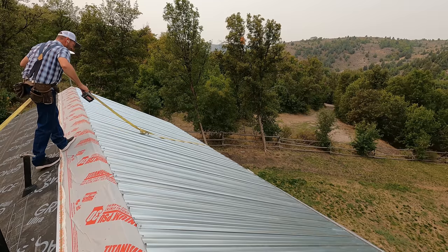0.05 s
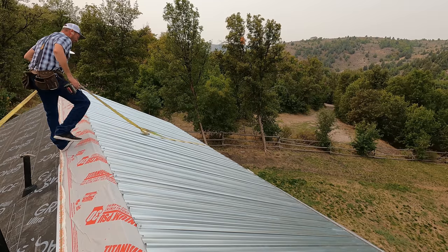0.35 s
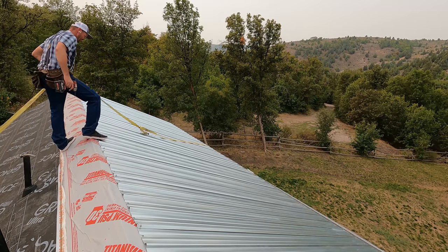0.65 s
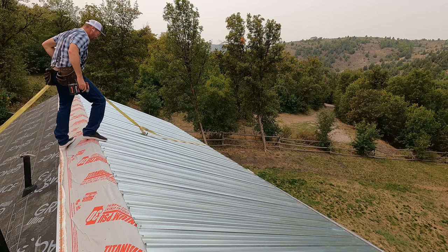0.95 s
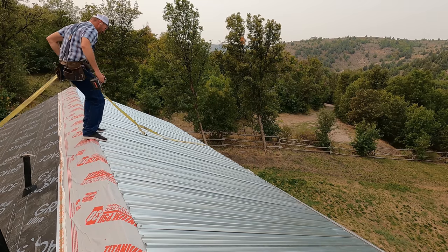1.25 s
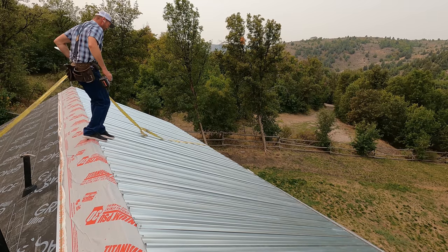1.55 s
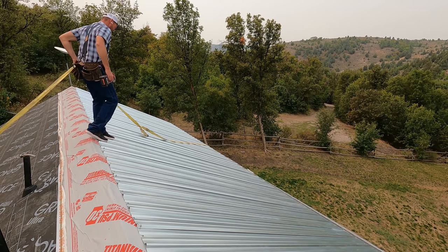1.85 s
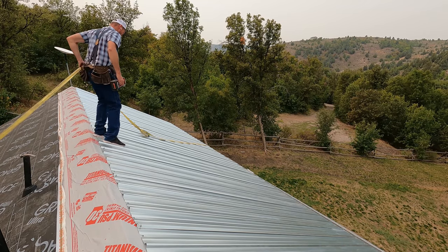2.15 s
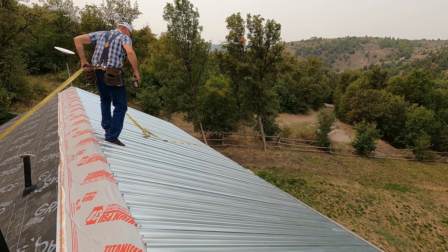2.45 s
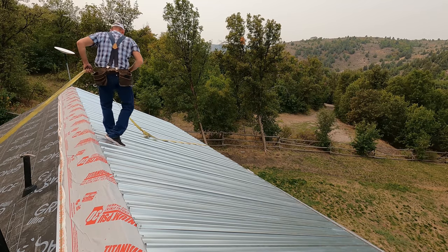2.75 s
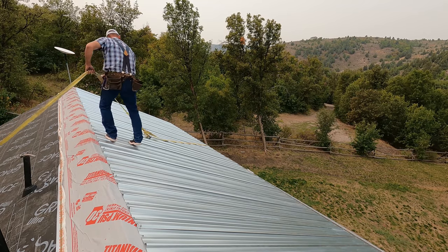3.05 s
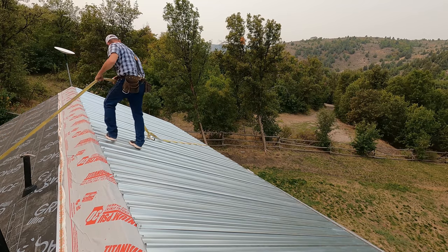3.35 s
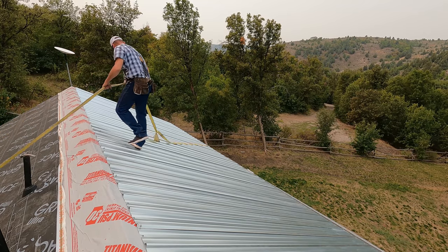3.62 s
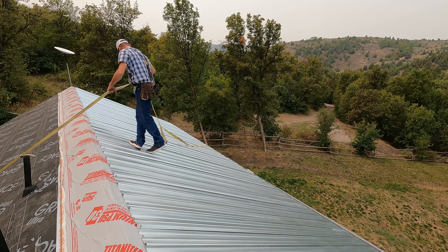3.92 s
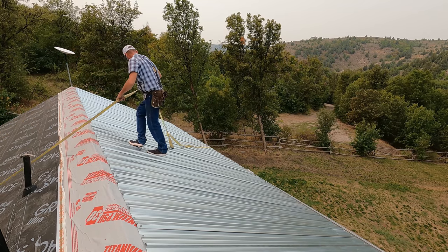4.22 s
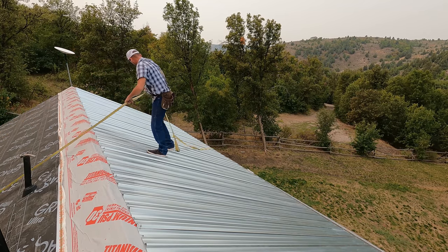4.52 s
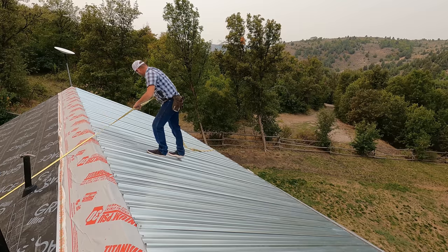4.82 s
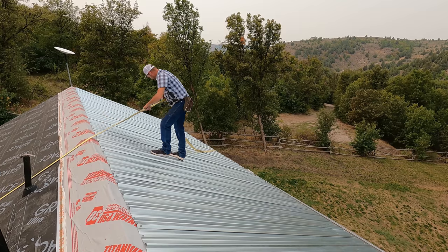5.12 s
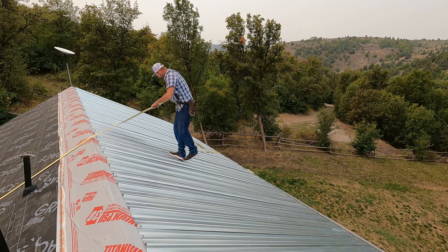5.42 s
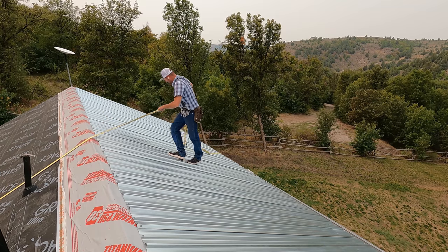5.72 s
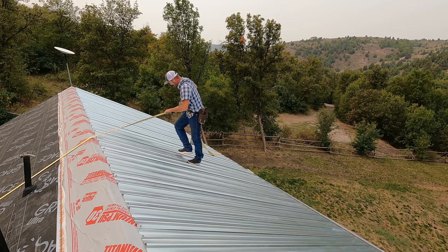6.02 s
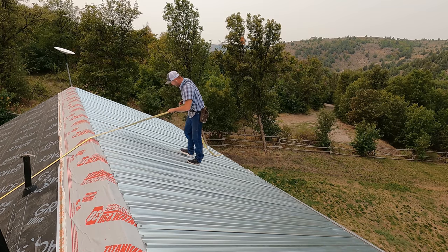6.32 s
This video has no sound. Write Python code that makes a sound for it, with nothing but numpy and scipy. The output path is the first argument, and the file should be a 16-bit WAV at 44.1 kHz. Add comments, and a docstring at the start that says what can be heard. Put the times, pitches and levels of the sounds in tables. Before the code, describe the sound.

Footsteps clack and thud on loose ribbed metal roof panels, with harness hardware clinking and soles scuffing in open air.

```python
"""Loose ribbed steel panels clack under a roofer who steps over the ridge and backs down on a safety rope.
Each step slaps the sheet against the deck in a cluster of clacks; the deck thuds and the ribs buzz.
Steel rings, a snap hook and a buckle clink on his harness; underlay ticks, soles and rope scuff.
One microphone a few metres away, in open air with almost no echo; faint wind in distant trees."""
import sys
import numpy as np
from scipy import signal
from scipy.fft import rfft, irfft
from scipy.io import wavfile

SR = 44100
rng = np.random.default_rng(int(sys.argv[2]) if len(sys.argv) > 2 else 0)


def wav_record(signal):
    """Record a signal, one row per channel, as 16-bit PCM in the file named by sys.argv[1]."""
    frames = np.transpose(np.atleast_2d(signal))
    bounded = np.clip(frames, -1, 1)
    # unit amplitude maps onto the largest positive 16-bit level
    quanta = np.round(bounded * 32767).astype(np.int16)
    wavfile.write(sys.argv[1], SR, quanta)


N = 289720
SPAN = int(.7 * SR)  # samples in one event
AGE = np.arange(SPAN) / SR  # seconds since it began

# tone of the steel panel: (frequency [Hz], level [dB])
PANEL = [(40, -16), (95, -12.5), (135, -6), (200, -3), (420, 2), (620, 5.5), (930, 0.5), (1400, 5),
         (2100, 7.5), (3600, -12), (4500, -16), (7400, -32), (9200, -46), (10700, -43), (15000, -72)]
# its resonances and dips: (frequency [Hz], width [Hz], lift [dB])
RESONANCES = [(155, 23, 0.5), (268, 18, 5), (317, 30, 3), (374, 47, 3), (507, 22, -2), (510, 40, 1.5),
              (595, 42, 1.5), (686, 33, -0.5), (1513, 50, 4), (1555, 27, 4), (1895, 13, 7.5),
              (1934, 230, -6), (2010, 28, 5), (2090, 32, -14), (2297, 57, -14)]
# sheet hitting the deck: (time [s], force [dB], crack sharpness [dB], weight on the deck [dB]);
# the last two count from the force
SLAPS = [(.001, -46.5, 4, 2), (.035, -55, 7, -8), (.057, -44, 15, 4), (0.114, -52, 8, 11),
         (0.175, -55, 6, -4), (0.272, -43, -7, -3.5), (.354, -42, 16, -14), (.727, -67, 0, 11.5),
         (.86, -65, 0, 15.5), (1.048, -44, 12.5, -26), (1.19, -45, 0, -11), (1.197, -39.5, 14, -17),
         (1.216, -41.5, 16, -15), (1.236, -34.5, 17, -8), (1.292, -42.5, 13, -4), (1.317, -42, 10, -5),
         (1.342, -42, 6, 0), (1.367, -41, 6, -4), (1.416, -44, 8, 3.5), (1.476, -35.5, 16, -10),
         (1.529, -40, 19, 3.5), (1.577, -50, 5, 4), (1.626, -49.5, 10, 4), (1.685, -37.5, 11, -11.5),
         (2.259, -59, 21, 13), (2.308, -59, 20, 9.5), (2.409, -57, 11, -17), (2.456, -56, 21, -15),
         (2.471, -51.5, 4, -26), (3.009, -71, -3, 15), (3.23, -42, 9, 1), (3.239, -40.5, 20, -0.5),
         (3.307, -46, 12, 3), (3.36, -49.5, 2, -12), (3.419, -52.5, 10, 0), (3.528, -50.5, -2, 3),
         (3.605, -46.5, 18, 5), (3.656, -48.5, 5, 12.5), (3.7, -43, 1, 1), (3.751, -40.5, 2, 6),
         (3.861, -31.5, 13, -2.5), (3.93, -35.5, 7, -10), (3.964, -36.5, 16.5, -7.5),
         (4.106, -52.5, 10.5, -10), (4.192, -48.5, 10, 12), (4.226, -47.5, 12.5, -13),
         (4.249, -31, 15.5, 4), (4.258, -33.5, 11.5, -8), (4.394, -41.5, 4, -9), (4.42, -47.5, 0, -7),
         (4.491, -48, 17, -10), (4.604, -35, 11, -7.5), (4.702, -40, -5, -7), (4.727, -36.5, 5, -7),
         (4.831, -40, 0, -4), (4.947, -47, 4, -4), (5.215, -55.5, 0, 0), (5.687, -60.5, 8, 8),
         (6.359, -61.5, 20, -37), (6.546, -47.5, 7, -19)]
USUAL_FORCE_DB = -42


def sheet_slaps(bass_hz=800, treble_hz=3500, middle_t60=0.17, rattle_db=2, grit_db=-14):
    """A few metres off, the sheet cracks against the deck, rattles on it and rings briefly."""
    out, onset = np.zeros(N), int(0.01 * SR)
    for s, force_db, sharp_db, weight_db in SLAPS:
        shake = rng.standard_normal(SPAN) + undb(rattle_db) * contacts(500, 5.3, SPAN)
        sheet = colour(shake, PANEL, RESONANCES)
        bass = band(sheet, bass_hz, "low") * fade(middle_t60 * 0.94) * (1 - np.exp(-AGE / 0.00043))
        middle = band(sheet, [bass_hz, treble_hz], "band") * fade(middle_t60)
        treble = band(sheet, treble_hz, "high") * fade(middle_t60 * 0.88)
        # harder slaps are brighter; weight adds bass
        harder_db = force_db - USUAL_FORCE_DB
        bass_db = -.5 - 0.11 * harder_db + .15 * weight_db
        treble_db = -5 + 0.36 * harder_db
        for part, db in (bass, bass_db), (middle, 0), (treble, treble_db):
            add(out, s, part * undb(force_db + db) / np.std(part[:onset]))
        blow = (AGE == 0) + undb(grit_db) * contacts(5000, 3, SPAN) * fade(0.0057)
        crack = colour(blow, PANEL, RESONANCES)
        add(out, s + 0.000953, crack * undb(force_db + sharp_db - 2) / np.abs(crack).max())
    # a thin open sheet radiates little deep bass
    return band(out, 85, "high", order=1)


def deck_thuds(main_hz=152.2, detune=0.062, t60=0.19, push_s=0.0058, gain_db=-4.5):
    """The deck gives under the weight behind each slap: a few low, heavily damped modes."""
    out = np.zeros(N)
    envelope = fade(t60) * (1 - np.exp(-AGE / push_s))
    for s, force_db, _, weight_db in SLAPS:
        for ratio, mode_db in (.6, -12), (.8, -5), (1, -1.5), (1.4, -3), (1.9, -14):
            hz = main_hz * ratio * (1 + detune * rng.standard_normal())
            mode = np.sin(2 * np.pi * (hz * AGE + rng.random()))
            add(out, s, undb(force_db + weight_db + mode_db + gain_db) * mode * envelope)
    return band(out, 90, "high", order=4)


# how loosely the panel underfoot lies: (time [s], buzz level relative to the force [dB])
LOOSENESS = [(0, -10), (2.6, -7), (3.25, 0.5), (3.6, -6), (3.9, 5.5), (4.3, 9.5), (4.65, -0.5), (5, -5.5),
             (6.57, -4)]


def rib_buzzes(rib_hz=2050, trip_s=0.011, packet_s=0.001064, trip_db=-3.0, trips=14, t60=0.2):
    """After a firm slap a wave packet runs to and fro along a rib, fading into a ring."""
    out = np.zeros(N)
    for s, force_db, _, _ in SLAPS:
        if force_db < USUAL_FORCE_DB - 6:
            continue
        sheet = colour(rng.standard_normal(SPAN), PANEL, RESONANCES)
        ring = undb(-3) * unit(band(sheet, [rib_hz * 0.867, rib_hz * 1.197], "band"))
        for trip, (late, pitch, size) in enumerate(rng.standard_normal((trips, 3))):
            since = AGE[:SPAN // 4] - packet_s - trip_s * (trip + 0.205 * late * min(trip, 1))
            tone = np.sin(2 * np.pi * rib_hz * (1 + .06 * pitch) * since)
            packet = np.exp(-(since / packet_s) ** 2) * tone
            ring[:len(packet)] += 1.3 * undb(0.65 * size + trip_db * trip) * packet
        loose_db = np.interp(s, *np.transpose(LOOSENESS))
        add(out, s + .007, undb(force_db + loose_db) * ring * fade(t60))
    return band(out, [1200, 4200], "band", order=2)


# modes of the two rings, the hook, its gate and the buckle: (frequency [Hz], level [dB], base t60 [s])
LARGE_RING = [(2501, 0, .26), (7340, -25, .2), (7438, -23, .2)]
SMALL_RING = [(2618, 0, .22), (6781, -14, .28), (7460, -14, .13), (7648, -10, .15), (7790, -19, .09),
              (13120, -35, .2)]
HOOK = [(3320, 0, .46)]
GATE = [(6126, 0, .28), (9955, -22, .32), (14050, -42, .3)]
BUCKLE = [(3145, -2, .12), (3405, -2, .19), (6440, -9, .1)]
# steel parts by name: (level [dB], free ringing [multiple of base t60], modes)
HARNESS = {"large ring": (0, 2.12, LARGE_RING), "small ring": (0, 1.8, SMALL_RING), "hook": (0, 1.84, HOOK),
           "gate": (-3.3, 1.83, GATE), "buckle": (-1.2, 1.6, BUCKLE)}
# two parts knocking together: (time [s], level [dB], overtone tilt [dB/octave],
# ring length [share of free ringing], struck part, striking part)
CLINKS = [(.302, -37.5, -6, 0.62, "buckle", "hook"), (.318, -35, -10.5, 0.46, "large ring", "small ring"),
          (1.637, -42.5, -15, 0.92, "large ring", "small ring"), (1.659, -53, -3, 1, "gate", "large ring"),
          (1.701, -38, -12, 0.91, "large ring", "small ring"), (1.731, -54, -2, 0.64, "gate", "large ring"),
          (1.817, -49.5, 0, 0.81, "large ring", "buckle"), (2.227, -60, -14, 1, "large ring", "buckle"),
          (3.822, -34.5, -8, 1, "large ring", "buckle"),
          (3.966, -31.5, 3.5, 0.86, "small ring", "large ring"), (3.966, -32, 7, 0.94, "gate", "hook"),
          (4.311, -34, -1, 1, "large ring", "small ring"), (4.405, -45.5, -10, 1, "hook", "large ring"),
          (4.608, -42.5, 3, 1, "large ring", "hook"), (4.673, -50, 2, 1, "gate", "large ring"),
          (4.748, -35.5, -10, .8, "small ring", "large ring"), (4.772, -43.5, -10, 0.8, "gate", "hook"),
          (4.795, -35.5, -11, 0.88, "buckle", "large ring"),
          (4.895, -46, -19.5, 1, "large ring", "small ring"), (5.202, -52, -11, 0.83, "small ring", "hook"),
          (5.834, -60, -16, 0.85, "large ring", "buckle")]


def harness_clinks(striker_db=-4, neighbour_db=-13.5, scatter_db=2.0, spin_hz=9, contact_s=0.0011):
    """On the roofer's harness two steel parts knock together, chatter and shake their neighbours."""
    out = np.zeros(N)
    for s, knock_db, tilt_db, free, struck, striker in CLINKS:
        for name, (part_db, length, modes) in HARNESS.items():
            share_db = {struck: 0, striker: striker_db}.get(name, neighbour_db)
            for hz, db, t60 in modes:
                size, speed = rng.standard_normal(2)
                mode_db = db + tilt_db * np.log2(hz / modes[0][0]) + scatter_db * size
                envelope = fade(t60 * length * free) * (1 - np.exp(-(AGE / contact_s) ** 2))
                # a swinging part turns its lobes past the microphone, so each mode dips and swells
                lobes = .75 + .5 * np.cos(2 * np.pi * spin_hz * np.exp(.15 * speed) * AGE - np.pi / 6)
                # while the parts still touch, each mode is jostled in size and phase
                jostle = 1 + undb(-9) * fade(0.25) * (walk(260, SPAN) + 1j * walk(250, SPAN))
                tone = np.real(jostle * np.exp(2j * np.pi * (hz * AGE + rng.random())))
                add(out, s, undb(knock_db + share_db + part_db + mode_db) * envelope * lobes * tone)
        touch = band(rng.standard_normal(SPAN) * fade(0.0071), [2300, 6000], "band")
        add(out, s, touch * undb(knock_db - 6))
    return out


# plastic underlay and grit on the roof: (time [s], level [dB])
TICKS = [(0.4654, -33.5), (0.493, -39), (0.514, -42), (0.5538, -40), (.5916, -31.5), (.613, -35.5),
         (.6526, -30), (0.6718, -33), (0.6801, -31.5), (1.0839, -33), (1.1533, -34.5), (1.173, -32),
         (2.0911, -44.5), (2.119, -47), (2.292, -45.5), (2.5328, -43.5), (2.5613, -51), (2.775, -47.5),
         (5.9312, -46), (6.064, -42.5), (6.2, -45.5), (6.3992, -47), (6.4383, -44), (6.467, -45)]


def underlay_ticks(tick_hz=3030, grit_db=-6, tail_db=-27, faint_db=-51, faint_count=6):
    """Plastic and grit snap for a few cycles, with a rough edge and a tail; faint ticks fall at random."""
    out = np.zeros(N)
    faint = [(when * N / SR, faint_db) for when in rng.random(faint_count)]
    grit_envelope = undb(grit_db) * fade(0.0052) + undb(tail_db) * fade(0.1)
    for s, db in TICKS + faint:
        cycles = AGE * tick_hz * np.exp(0.14 * rng.standard_normal())
        snap = cycles * np.exp(-2 * cycles) * np.sin(2 * np.pi * cycles)
        grit = band(rng.standard_normal(SPAN), [1800, 9000], "band") * grit_envelope
        add(out, s + 0.00123, undb(db) * (snap / np.abs(snap).max() + grit))
    return band(out, [2100, 6500], "band")


# tone of scraping rubber and rope: (frequency [Hz], level [dB])
SCRAPE = [(500, -23), (900, -2.5), (1500, 0), (2400, 3.5), (3800, -4.5), (6800, -19), (9000, -39),
          (11000, -35), (15000, -63)]
# shifts of weight on the panels: (time [s], length [s], rumble level [dB], scrape level [dB])
SHUFFLES = [(0, .16, -47.5, -50), (0.241, 0.19, -53, -53), (0.821, 0.3, -58.5, -58),
            (1.178, 0.42, -52.5, -54.5), (1.618, 0.2, -61.5, -54.5), (1.956, 0.29, -63.5, -73),
            (2.433, 0.048, -62, -63.5), (2.676, 0.077, -63, -71), (2.88, 0.36, -64.5, -90),
            (3.19, 0.47, -57, -60), (3.595, 0.34, -53.5, -50), (4.257, 0.17, -49, -46.5),
            (4.619, 0.24, -49.5, -43), (4.897, .34, -56.5, -54.5), (5.46, 0.66, -68, -70),
            (6.37, .21, -73, -70)]


def rubbing(attack_s=0.029, release_t60=0.5, rumble_hz=800, gain_db=-1, waver_db=2):
    """Soles and rope stick and slip in dense small steps; the loaded panel grumbles under them."""
    t, load, drag = np.arange(N) / SR, 0, 0
    for s, length, rumble_db, scrape_db in SHUFFLES:
        release = np.exp(-np.log(1000) * np.maximum(t - s - length, 0) / release_t60)
        push = np.clip((t - s) / attack_s, 0, 1) * release
        load = np.maximum(load, push * undb(rumble_db))
        drag = np.maximum(drag, push * undb(scrape_db))
    rumble = unit(band(colour(contacts(900, 2.6, N), PANEL, RESONANCES), rumble_hz, "low"))
    slips = contacts(4000, 2.8, N)
    crackles = undb(-1) * contacts(180, 0.83, N)
    scrape = unit(colour(slips + crackles, SCRAPE))
    return (rumble * load + scrape * drag) * undb(gain_db + waver_db * walk(45, N))


def sole_creak(start_s=2.02, end_s=2.2, slip_s=0.023, hz=350, slip_db=-53, slip_t60=0.093):
    """A sole twisting on the steel creaks in slow, dull slips."""
    out = np.zeros(N)
    for s in np.arange(start_s, end_s, slip_s):
        late, pitch, size = rng.standard_normal(3)
        tone = np.sin(2 * np.pi * hz * (1 + .12 * pitch) * AGE)
        add(out, s + 0.0021 * late, undb(slip_db + 2 * size) * fade(slip_t60) * tone)
    return band(out, 750, "low")


def sole_scuff(s=2.92, db=-60, band_hz=(1100, 1950)):
    """A sole brushes softly across the ribs."""
    swell = np.exp(-((np.arange(N) / SR - s) / .035) ** 2)
    return undb(db) * swell * unit(band(contacts(4000, 2.3, N), band_hz, "band", order=2))


# open air around the roof: (frequency [Hz], level [dB])
AIR = [(15, -68), (25, -15), (95, -12.5), (167, -1.5), (231, -4), (573, -3), (952, -9.5), (1060, -5.5),
       (2930, -9), (3930, -14.5), (6900, -24), (9020, -39), (15000, -45)]


def wind(db=-65, drift_db=0.69):
    """Light wind in trees far from the microphone."""
    return undb(db + drift_db * walk(0.45, N)) * unit(colour(rng.standard_normal(N), AIR))


def undb(db):
    """Decibels to gain."""
    return 10 ** (np.asarray(db) / 20)


def unit(x):
    """Scale to rms 1."""
    return x / np.sqrt(np.mean(x ** 2))


def fade(t60):
    """Exponential decay over one event."""
    return np.exp(-np.log(1000) * AGE / t60)


def add(track, s, x):
    """Mix x into the track from time s on."""
    i = max(int(s * SR), 0)
    track[i:i + len(x)] += x[:max(N - i, 0)]


def colour(x, points, bumps=(), size=8192):
    """Causal filter from a smooth spectrum and resonant bumps."""
    f = np.arange(size // 2 + 1) * SR / size + 1
    hz, db = np.transpose(points)
    bumps_db = sum(lift / (1 + (2 * (f - centre) / width) ** 2) for centre, width, lift in bumps)
    db = np.interp(np.log(f), np.log(hz), db) + bumps_db
    # folding the cepstrum gives minimum phase
    cepstrum = irfft(np.log(undb(db)))
    cepstrum[1:size // 2] *= 2
    cepstrum[size // 2 + 1:] = 0
    return signal.fftconvolve(x, irfft(np.exp(rfft(cepstrum))))[:len(x)]


def band(x, hz, kind, order=3):
    """Butterworth filter."""
    return signal.sosfilt(signal.butter(order, hz, kind, fs=SR, output="sos"), x)


def walk(rate, size):
    """Smooth random wander, spread near 1."""
    steps = rng.standard_normal(size // 50)
    return np.sqrt(1.5) * np.interp(np.arange(size) * rate / SR, np.arange(len(steps)), steps)


def contacts(rate, spread_db, size):
    """Tiny impacts at random moments, of unequal strength; rms 1."""
    hits = (rng.random(size) < rate / SR) * rng.choice([-1, 1], size)
    return unit(hits * undb(spread_db * np.clip(rng.standard_normal(size), -2, 2)))


def scene():
    """One microphone a few metres from the roofer feeds both channels alike."""
    roof = sheet_slaps() + deck_thuds() + rib_buzzes()
    mono = roof + harness_clinks() + underlay_ticks() + rubbing() + sole_creak() + sole_scuff() + wind()
    return np.array([mono, mono])


def record(dry, top_hz=15300, right_top_hz=13000):
    """The highest treble is rolled off, a little lower on the right."""
    right = signal.sosfiltfilt(signal.butter(6, right_top_hz, fs=SR, output="sos"), dry[1])
    treble_cut = signal.ellip(8, .2, 70, top_hz, fs=SR, output="sos")
    return signal.sosfilt(treble_cut, np.array([dry[0], right]))


dry = scene()
out = record(dry)
wav_record(out)
```